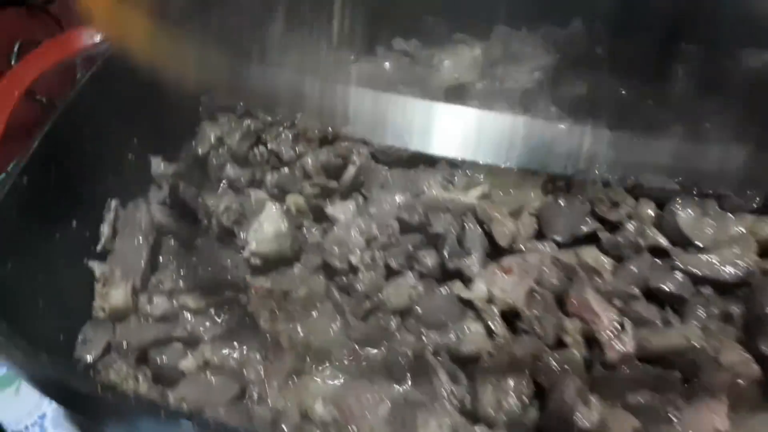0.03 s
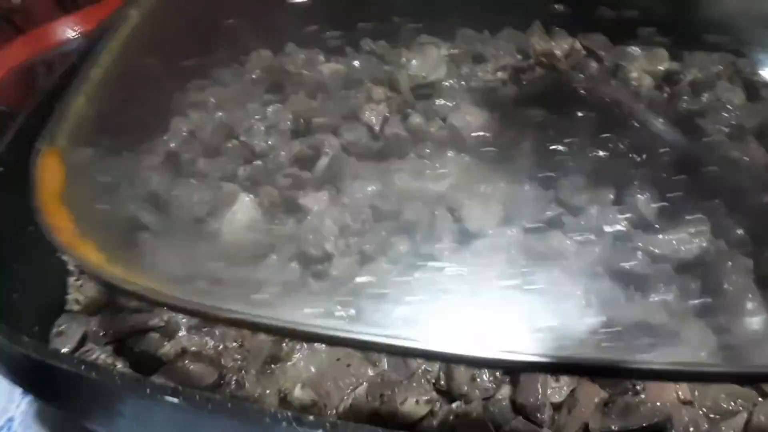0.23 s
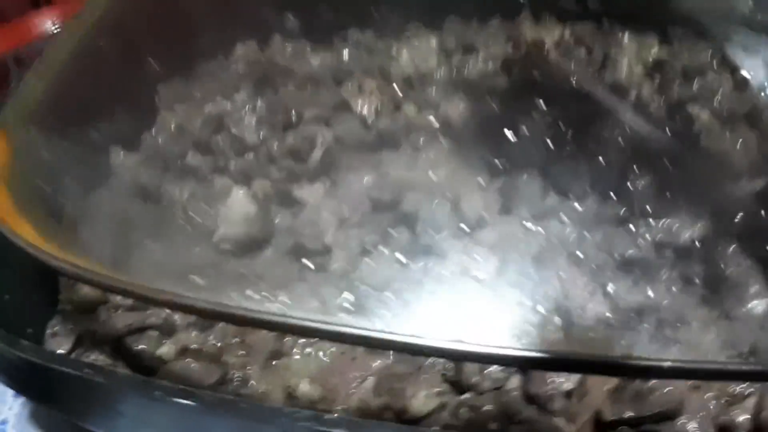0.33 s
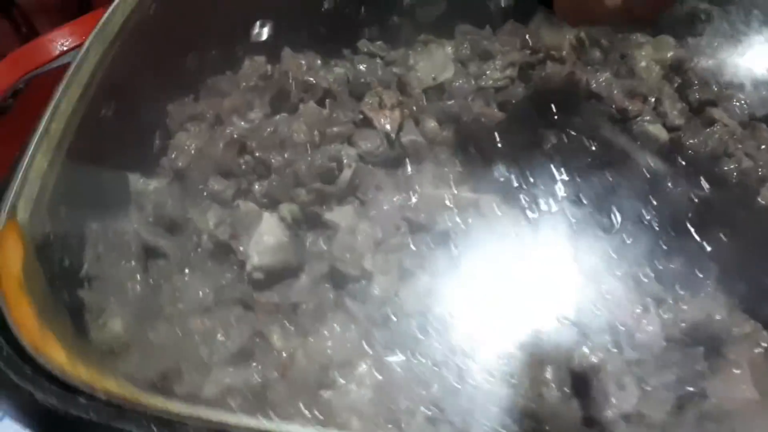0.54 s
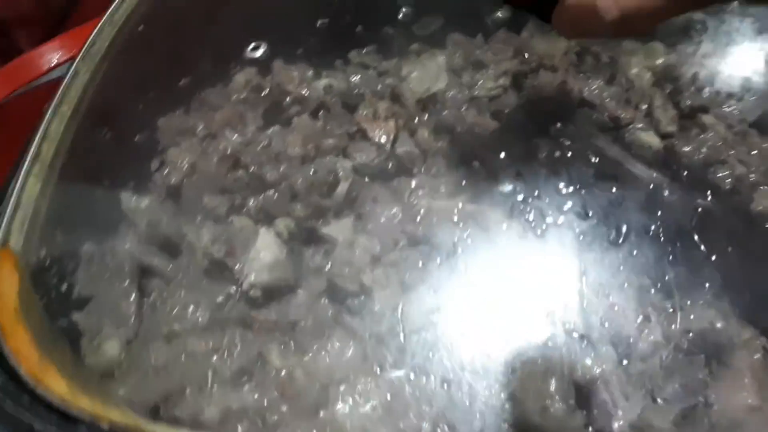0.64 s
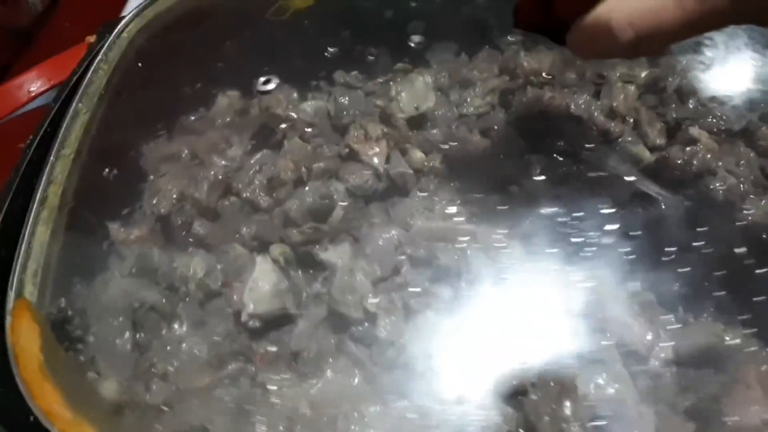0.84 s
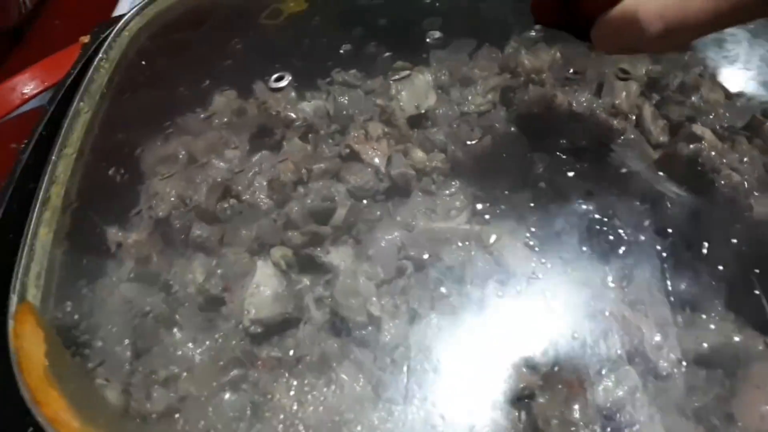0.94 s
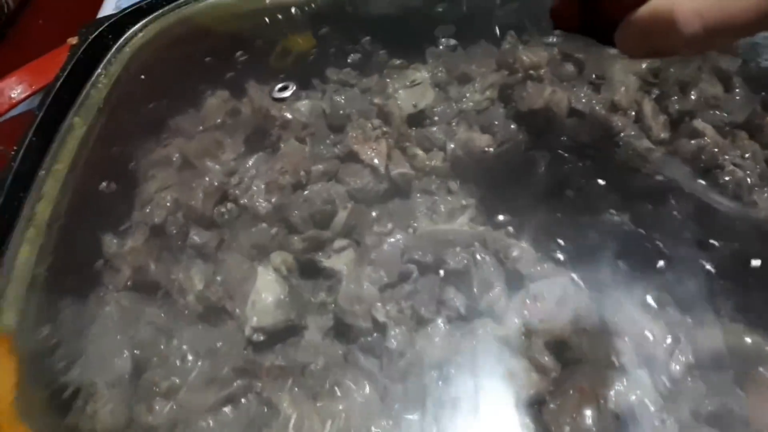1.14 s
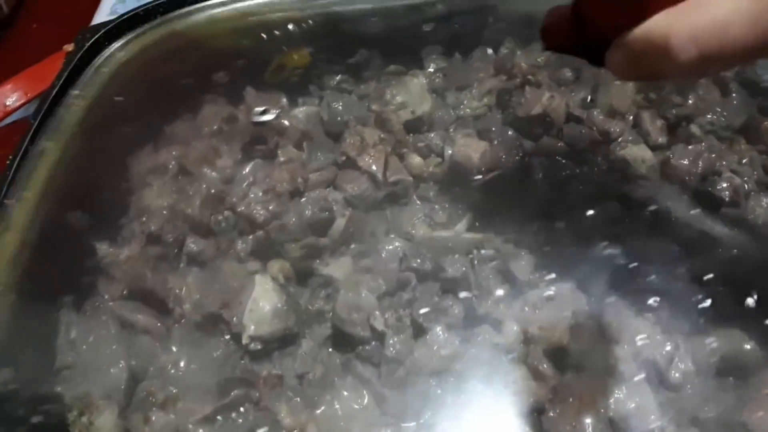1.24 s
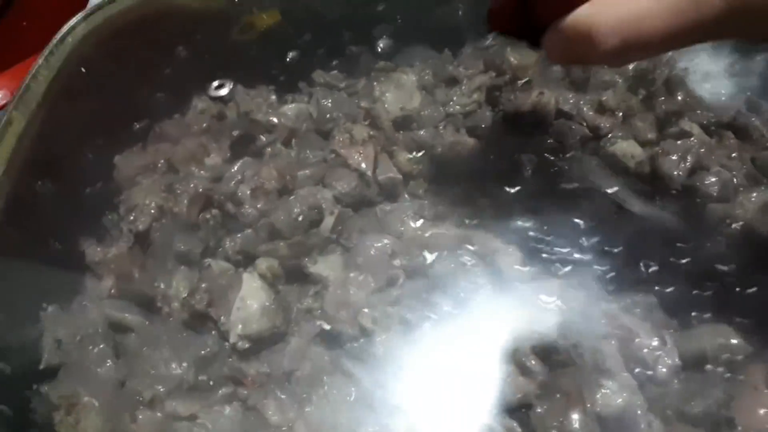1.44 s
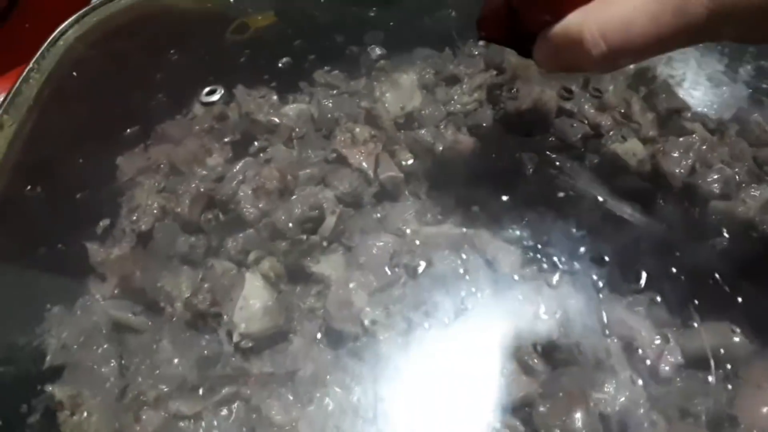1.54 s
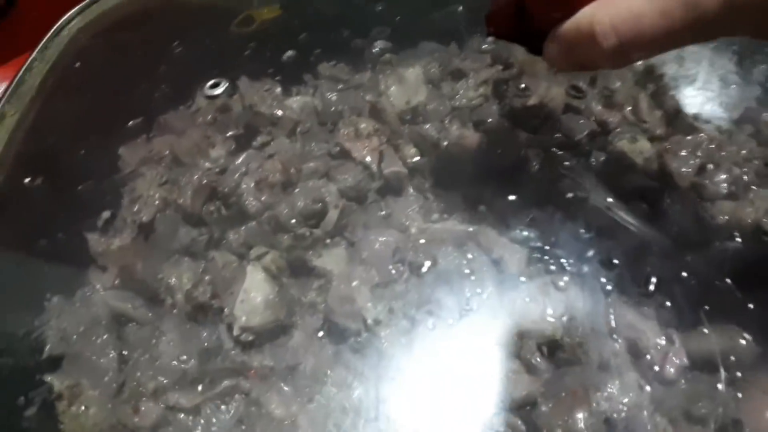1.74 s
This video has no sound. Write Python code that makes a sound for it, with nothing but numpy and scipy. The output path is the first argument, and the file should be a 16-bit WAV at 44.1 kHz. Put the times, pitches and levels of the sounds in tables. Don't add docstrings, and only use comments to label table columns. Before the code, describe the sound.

A glass lid clatters onto a deep pan of frying meat, knocking and rocking into place

```python
import sys
import numpy as np
from scipy import signal
from scipy.fft import rfft, irfft, next_fast_len
from scipy.io import wavfile
from scipy.ndimage import uniform_filter1d, map_coordinates

SR = 44100
rng = np.random.default_rng(int(sys.argv[2]) if len(sys.argv) > 2 else 0)


def to_wav(s):
    ch = np.atleast_2d(s).T
    pcm = np.round(np.clip(ch, -1, 1) * 32767)
    wavfile.write(sys.argv[1], SR, pcm.astype(np.int16))


def convert_level_to_amplitude(level_db):
    exponent = np.asarray(level_db, float) / 20
    return 10 ** exponent


N = 79380

# start_s, level_db (peak), crack_db, decay_scale (ratio)
CLACKS = [(0.2188, -9, -25, 0.85), (0.249, -9.5, -30, 0.82), (0.26, -8, -30.5, 0.32),
          (0.2745, -9.5, -29, 0.9), (0.291, -3.5, -37, 0.4), (0.305, -5, -31.5, 0.53), (0.397, -15, -37, 1),
          (0.56, -18, -46, 0.5), (0.583, -14.5, -44.5, 0.22), (0.857, -25, -70, 0.98),
          (1.066, -27, -49, 0.5), (1.079, -23.5, -46.5, 0.64), (1.1915, -17.5, -44, 0.74),
          (1.212, -22, -64, 0.49), (1.245, -10, -33.5, 0.55), (1.2786, -13.5, -34, 0.97),
          (1.384, -21.5, -46.5, 1), (1.424, -30, -56, 1), (1.4562, -1.5, -39, 0.29),
          (1.465, -13.5, -36, 0.6), (1.481, -16.5, -40.5, 0.38), (1.508, -19.5, -43.5, 0.34),
          (0.215, -30, -35.5, 0.35), (0.311, -16.5, -36, 0.64), (0.4587, -39, -51, 0.58),
          (0.577, -15, -41, 0.26), (0.873, -33, -59, 0.73), (0.912, -42, -69, 0.67), (1.107, -24, -75, .5),
          (1.136, -20.5, -44.5, 0.76)]
CONTACT_RISE_S = 0.00098


def unit(x):
    return x / np.sqrt(np.mean(x ** 2) + 1e-20)


def along(points, hz):
    point_hz, value = np.transpose(points)
    return np.interp(np.log(hz + 1), np.log(point_hz + 1), value)


def filtered(x, response):
    size = next_fast_len(N + 8192)
    hz = np.fft.rfftfreq(size, 1 / SR)
    return irfft(rfft(x, size) * response(hz), size)[..., :N]


def noise(spectrum, alike):
    def mid_and_side(hz):
        turn = np.arccos(np.clip(along(alike, hz), -1, 1)) / 2
        return convert_level_to_amplitude(along(spectrum, hz)) * [np.cos(turn), np.sin(turn)]

    mid, side = filtered(rng.standard_normal((2, N)), mid_and_side)
    return unit(np.array([mid + side, mid - side]))


def ring(modes, t, rise_s, scale, chance, scatter_db):
    hz, db, t60 = np.transpose(modes)[:, :, None]
    count = len(hz)
    hz = hz * (1 + 0.0052 * chance[-count:, None])
    fade = convert_level_to_amplitude(db + scatter_db * chance[:count, None] - 60 * t / (t60 * scale))
    tones = fade * np.sin(2 * np.pi * hz * t)
    return tones.sum(0) * (1 - np.exp(-t / rise_s))


def add(out, start_s, x):
    out[..., round(start_s * SR):][..., :x.shape[-1]] += x


def slow_wobble():
    points = rng.standard_normal((2, 60))
    side = np.repeat([[0], [1]], N, 1)
    place = np.tile(np.arange(N) * 25 / SR, (2, 1))
    return map_coordinates(points, [side, place])


def kitchen_hum(wobble):
    # pitch_hz, level_db (per Hz)
    colour = [(25, -52), (60, -22.5), (140, -11), (420, -4.5), (620, -12), (1200, -15.5), (9000, -45.5),
              (16000, -71)]
    # pitch_hz, likeness (0 to 1)
    likeness = [(60, 0.68), (290, 1), (640, 0.65), (1400, 0)]
    mains = convert_level_to_amplitude(-60) * np.sin(2 * np.pi * 58.5 * np.arange(N) / SR)
    return convert_level_to_amplitude(-48.5 + 2.5 + 0.47 * wobble) * noise(colour, likeness) + mains


def frying(wobble):
    # time_s, fizz_db, hiss_db
    sizzle = [(0, -57, -56), (.2, -58, -67), (.4, -60, -76), (.62, -60, -70), (.75, -66, -89),
              (.95, -61, -72), (1.13, -62, -72), (1.35, -63, -79), (1.55, -58.5, -75), (1.67, -64.5, -69),
              (1.8, -91, -68.5)]
    # pitch_hz, level_db (per Hz)
    fizz_colour = [(880, -1), (1500, -3.5), (1870, 1.5), (2140, -4), (16000, -19)]
    # pitch_hz, level_db (per Hz)
    hiss_colour = [(3000, -30), (6000, -14), (10000, -1), (16000, -1)]
    t = np.arange(N) / SR
    time_s, fizz_db, hiss_db = np.transpose(sizzle)
    bubbles = (rng.random(N) < 600 / SR) * convert_level_to_amplitude(1.53 * rng.exponential(size=N))
    pops = unit(uniform_filter1d(bubbles, size=40))
    fizz_level = convert_level_to_amplitude(np.interp(t, time_s, fizz_db) + 6)
    fizz = fizz_level * (1 + 0.27 * pops) * noise(fizz_colour, [(3000, 0)])
    hiss_level = convert_level_to_amplitude(np.interp(t, time_s, hiss_db) + 1.2 * wobble)
    hiss = hiss_level * (0.92 + 0.27 * pops) * noise(hiss_colour, [(3000, 0)])
    return fizz + hiss


def kitchen_echo(x):
    # pitch_hz, t60_s
    echo_time = [(150, 0.32), (1000, 0.26), (4000, 0.22), (12000, 0.24)]
    hz, t, z = signal.stft(rng.standard_normal((2, SR // 2)), SR, nperseg=256)
    fade = convert_level_to_amplitude(-60 * t / along(echo_time, hz)[:, None])
    tail = signal.istft(z * fade, SR, nperseg=256)[1]
    delayed = np.pad(x, (250, 0))[None]
    return signal.fftconvolve(delayed, tail / np.linalg.norm(tail[0]), axes=1)[:, :N]


def slip_grit():
    slips_per_s, slip_fade_s, even_share = 2000, 0.00073, 0.46
    slips = (rng.random(N) < slips_per_s / SR) * convert_level_to_amplitude(1.8 * rng.exponential(size=N))
    grains = unit(signal.fftconvolve(slips, np.exp(-np.arange(300) / SR / slip_fade_s))[:N])
    return unit(even_share + (1 - even_share) * grains)


def stroke(start_s, length_s, rise_s, fall_s):
    t = np.arange(N) / SR
    fall = np.exp(-np.clip(t - start_s - length_s, 0, None) / fall_s)
    return np.clip((t - start_s) / rise_s, 0, 1) * fall


def squeal(grit):
    # start_s, length_s
    moments = [
        (1.105, .035),
        (1.135, .025),
        (0.576, .012),
        (1.456, .008),
        (0.25, .06),
    ]
    # level_db, pitch_hz, width_hz
    bands = [(-48, 3700, 590), (-51.5, 4400, 1000), (-48, 4190, 510), (-34.5, 2570, 810), (-46, 2800, 2700)]
    rub = grit * rng.standard_normal((2, N))
    out = np.zeros((2, N))
    for (start_s, length_s), (db, pitch_hz, width_hz) in zip(moments, bands):
        band = unit(filtered(rub, lambda hz: np.exp(-((hz - pitch_hz) / width_hz) ** 2)))
        out += convert_level_to_amplitude(db) * stroke(start_s, length_s, 0.46 * length_s, 0.0066) * band
    return out


def scrape(grit):
    # start_s, length_s, level_db, tilt_db (per octave)
    slides = [
        (0.234, 0.069, -28, 0.5),
        (0.362, 0.11, -44, -0.1),
        (0.551, 0.015, -43, 2.4),
        (0.82, 0.1, -46, -1),
        (1.066, 0.07, -39.5, 0.1),
        (1.115, 0.04, -37.5, -2.5),
        (1.2, 0.065, -42.5, -9.5),
        (1.243, 0.036, -30.5, 0.9),
        (1.364, 0.029, -38.5, -0.8),
        (1.456, 0.074, -35.5, -2.5),
    ]
    # pitch_hz, level_db (per Hz)
    colour = [(290, -9), (550, -1.5), (850, -4.5), (1350, -3), (2300, -11.5), (4700, -22.5), (5600, -28),
              (16000, -38)]
    rasp = grit * noise(colour, [(500, 0.32), (1500, 0)])
    out = np.zeros((2, N))
    for start_s, length_s, db, tilt_db in slides:
        tilted = filtered(rasp, lambda hz: convert_level_to_amplitude(tilt_db * np.log2(np.maximum(hz, 500) / 1500)))
        out += convert_level_to_amplitude(db) * stroke(start_s, length_s, 0.015, 0.029) * tilted
    return out


def clear_tones():
    # start_s, level_db, pitch_hz, t60_s
    tones = [(.559, -34, 4650, 0.017), (0.649, -44, 8240, 0.014), (1.211, -34, 4800, 0.042),
             (.219, -30, 6120, 0.024), (.405, -32, 551.3, 0.28), (.561, -26, 1370, 0.028),
             (.583, -23.5, 1355, 0.02), (.858, -33, 1363, .06), (1.2435, -19, 1714, 0.044),
             (1.281, -28, 2738, 0.069), (1.457, -28, 2706, 0.045), (1.467, -16, 1359, 0.055),
             (1.738, -42, 412, .3)]
    out, t = np.zeros(N + SR), np.arange(SR // 6) / SR
    for start_s, db, hz, t60 in tones:
        shake = np.cumsum(rng.normal(0, hz / 30000, len(t)))
        tone = np.sin(2 * np.pi * hz * t + shake) * (1 - np.exp(-t / CONTACT_RISE_S))
        add(out, start_s, convert_level_to_amplitude(db - 60 * t / t60) * tone)
    return out[:N]


def rim_and_glass():
    # pitch_hz, level_db, t60_s
    rim = [(567.2, -2, 0.15), (829, 4, .05), (1074, -0.5, 0.029), (1230, -5.5, 0.029), (1297.5, 0, 0.049),
           (1335.6, 2, 0.05), (1429, -1.5, 0.056), (1582, -5, 0.071), (1810, -7, 0.083),
           (2268, -14.5, 0.088), (2670, -9.5, 0.064)]
    # pitch_hz, level_db (over the crack), t60_s
    glass = [(3300, -25, 0.023), (4800, 0, 0.022), (6120, -0.5, 0.02)]
    rise_s, scatter_db = 0.0011, 1.6
    out, t = np.zeros((2, N + SR)), np.arange(SR // 6) / SR
    for start_s, db, crack_db, scale in CLACKS:
        scale = max(scale, 0.1)
        left = rng.standard_normal(42)
        right = np.r_[0.6 * left[:14] + 0.8 * left[28:], left[14:28]]
        for side, chance in zip(out, (left, right)):
            add(side, start_s, convert_level_to_amplitude(db - 9.5) * ring(rim, t, rise_s, scale, chance, scatter_db))
            add(side, start_s, convert_level_to_amplitude(crack_db + 3) * ring(glass, t, rise_s, scale, chance[3:], scatter_db))
    return out[:, :N]


def cracks_and_knocks():
    # pitch_hz, level_db (per Hz)
    crack_colour = [(1470, -8), (2500, -14), (2740, -8), (5780, -14.5), (12300, -19.5), (16000, -33)]
    # pitch_hz, level_db (per Hz)
    knock_colour = [(350, -5), (600, -2.5), (1340, -10), (2260, -17.5), (3500, -21.5), (4550, -24),
                    (7700, -120)]
    soft_db, hard_db, dull_hz = -50, -34, 6000
    knock_db, knock_t60_s = -9.5, 0.069
    bright_gate, dull_gate, knock_gate = np.zeros((3, N + SR))
    t = np.arange(SR // 6) / SR
    rise = 1 - np.exp(-t / CONTACT_RISE_S)
    fade = convert_level_to_amplitude(-60 * t / 0.022) + 0.18 * convert_level_to_amplitude(-60 * t / 0.094)
    for start_s, db, crack_db, scale in CLACKS:
        hard = np.clip((crack_db - soft_db) / (hard_db - soft_db), 0, 1)
        snap = convert_level_to_amplitude(crack_db + 1.5) * fade * rise * 2
        add(bright_gate, start_s, hard * snap)
        add(dull_gate, start_s, (1 - hard) * snap * 1.7)
        add(knock_gate, start_s, convert_level_to_amplitude(db + knock_db - 60 * t / (knock_t60_s * max(scale, 0.1))) * rise)
    bright = noise(crack_colour, [(3000, 0.1), (12000, 0.11)])
    dull = filtered(bright, lambda hz: 1 / (1 + (hz / dull_hz) ** 4))
    knock = noise(knock_colour, [(600, 0.19), (2000, 0.063)])
    return bright_gate[:N] * bright + dull_gate[:N] * dull + knock_gate[:N] * knock


def thumps():
    # start_s, level_db (peak),
    # pitch_hz, t60_s
    blows = [(0.219, -4, 390, 0.025), (0.249, -4, 360, 0.035), (0.262, -5, 416, 0.028),
             (0.274, -5, 308, 0.012), (0.292, -8.5, 322, 0.024), (0.308, -8, 302.6, 0.05),
             (0.327, -18, 329.4, 0.14), (0.396, -11.5, 327, 0.061), (0.413, -12, 281, 0.051),
             (0.477, -21.5, 326, 0.083), (0.56, -14, 297, 0.034), (0.576, -10.5, 229, 0.059),
             (0.732, -25.5, 249, 0.05), (0.858, -9, 279, 0.037), (0.91, -24, 280, 0.045),
             (1.066, -18, 302, 0.05), (1.078, -14.5, 204, 0.05), (1.108, -18.5, 287, 0.043),
             (1.135, -26, 378, 0.098), (1.191, -13, 356, 0.035), (1.212, -21, 400, 0.021),
             (1.245, -4.5, 344, 0.067), (1.2512, -12, 354, 0.032), (1.278, -7.5, 342, 0.041),
             (1.385, -4.5, 269, 0.018), (1.403, -17, 240, 0.055), (1.465, -2.5, 217, 0.024),
             (1.476, -14.5, 248, 0.088), (1.529, -9.5, 149, 0.047),
             (0.221, -25, 128, 0.051),
        (1.502, -19.5, 146.6, 0.13),
        (1.518, -5, 204, 0.017),
        (1.537, -13.5, 133, 0.032),
             (0.224, -16, 388, 0.048), (0.459, -29.5, 150, 0.061), (0.469, -25.5, 320, 0.049),
                (0.503, -33, 321, 0.058), (0.522, -29.5, 322, 0.04), (0.55, -25.5, 295, 0.032),
                (0.587, -18, 233.5, 0.037), (0.601, -22.5, 274, 0.032), (0.618, -23, 290, .03),
                (0.782, -36, 299.5, 0.034), (0.873, -17, 288, 0.023), (0.925, -29, 303, 0.035),
                (0.938, -26, 275, 0.021), (0.973, -35.5, 315, 0.038), (1.092, -17.5, 290, 0.041),
                (1.118, -21, 161, 0.063), (1.265, -8, 320, 0.021), (1.309, -16, 300, 0.02),
                (1.319, -20.5, 324, 0.039), (1.423, -17.5, 274, .03), (1.438, -26.5, 270, 0.051),
                (1.507, -15, 270, 0.01), (1.525, -8, 324, 0.02)]
    # pitch_hz, level_db, t60_s
    body = [(230.2, -13.5, 0.29), (268.2, 5.5, 0.054), (319.6, -12, 0.16), (390, -23.5, 0.18),
            (440.3, -14, 0.19)]
    rise_s, hold, damp = 0.002, 0.72, 1.43
    out, t = np.zeros(N + SR), np.arange(SR // 3) / SR
    for start_s, db, hz, t60 in blows:
        fade = convert_level_to_amplitude(-60 * (t / max(hold * t60, 0.01)) ** damp)
        swell = 1 - np.exp(-(t / rise_s) ** 2)
        note = fade * np.sin(2 * np.pi * hz * t) * swell
        pan = ring(body, t, 0.014, 0.77, rng.standard_normal(28), 1.0)
        add(out, start_s, convert_level_to_amplitude(db + 3) * (note + convert_level_to_amplitude(-5.5) * pan))
    return out[:N]


def scene():
    lag_s, low_cut_hz, echo_db = 0.000965, 71.6, -10.5
    wobble, grit = slow_wobble(), slip_grit()
    left, right = rim_and_glass() + clear_tones()
    left = filtered(left, lambda hz: 0.34 + 0.86 * np.exp(-2j * np.pi * hz * lag_s))
    contacts = thumps() + np.array([left, right]) + cracks_and_knocks()
    rubbing = scrape(grit) + squeal(grit)
    near = filtered(contacts + rubbing, lambda hz: (1j * hz / (low_cut_hz + 1j * hz)) ** 2)
    return near + convert_level_to_amplitude(echo_db) * kitchen_echo(near[1]) + kitchen_hum(wobble) + frying(wobble)


def low_pass(x):
    return signal.sosfilt(signal.butter(12, 16670, fs=SR, output="sos"), x)


def record(dry):
    # pitch_hz, level_db
    left_db = [(60, -2), (200, -4.5), (380, -7), (3000, -5.5), (5000, -12), (15000, -6)]
    # pitch_hz, width_hz, level_db
    dips = [(5790, 1100, -6), (10040, 1250, -5.5)]
    top_hz, ceiling = 15900, 0.98

    def phone(hz):
        sides = convert_level_to_amplitude(along(left_db, hz) * np.array([[0.5], [-0.5]]))
        top = np.where(hz < top_hz, 1, convert_level_to_amplitude(-34.0)) * (hz < top_hz + 720)
        ports = convert_level_to_amplitude(sum(db * np.exp(-((hz - centre) / width) ** 2) for centre, width, db in dips))
        return sides * top * ports

    x = filtered(dry, phone)
    mix = x / (1 + np.abs(x / ceiling) ** 6) ** (1 / 6)
    return low_pass(mix)


dry = scene()
out = record(dry)
to_wav(out)
```